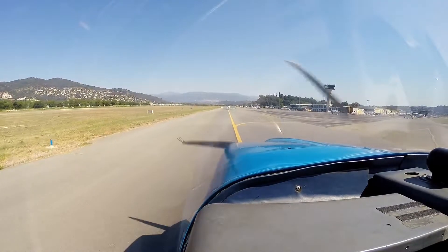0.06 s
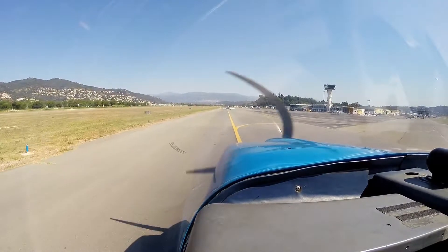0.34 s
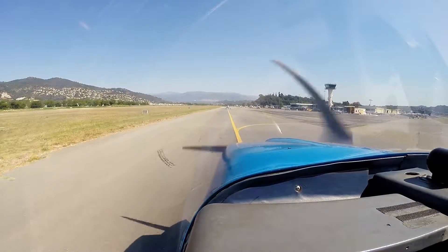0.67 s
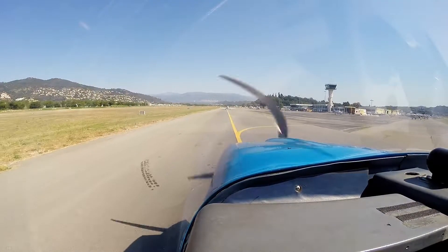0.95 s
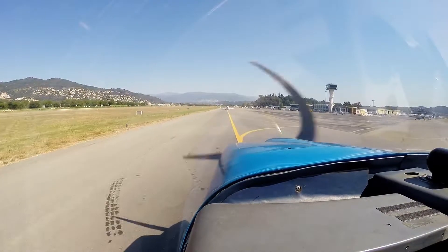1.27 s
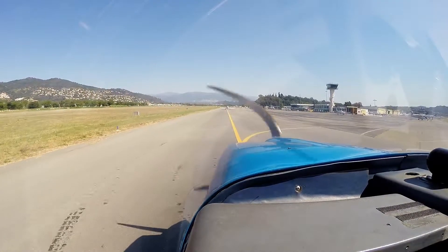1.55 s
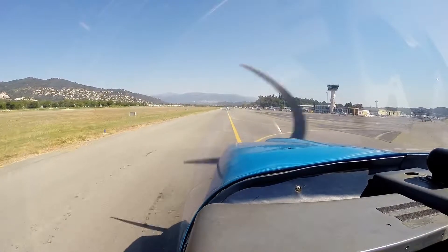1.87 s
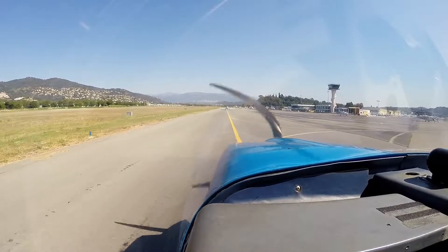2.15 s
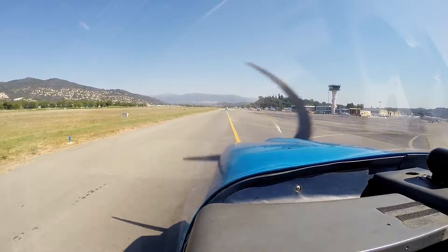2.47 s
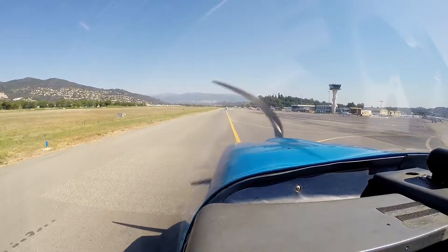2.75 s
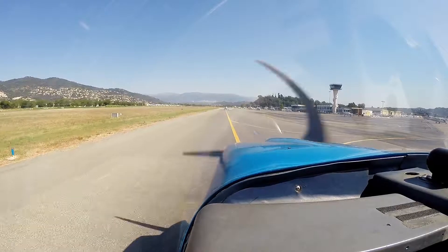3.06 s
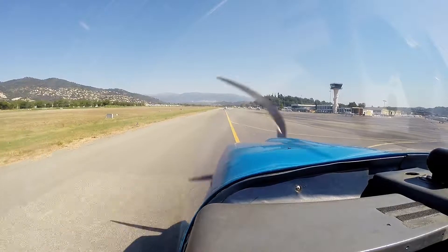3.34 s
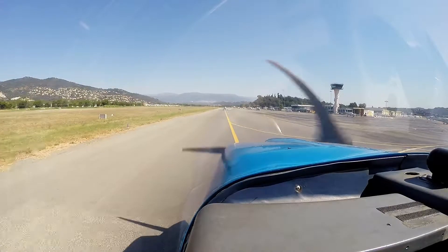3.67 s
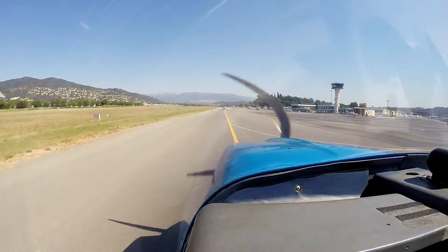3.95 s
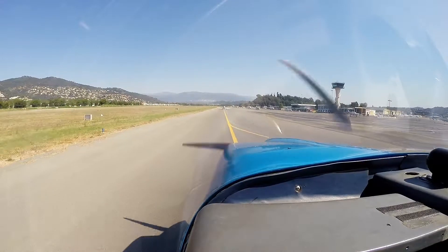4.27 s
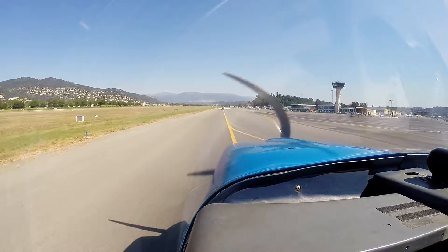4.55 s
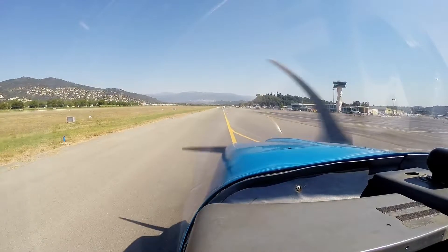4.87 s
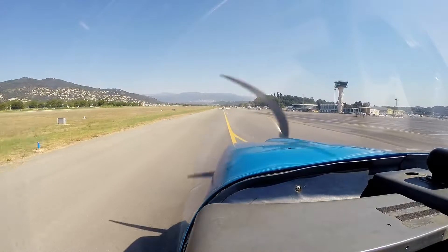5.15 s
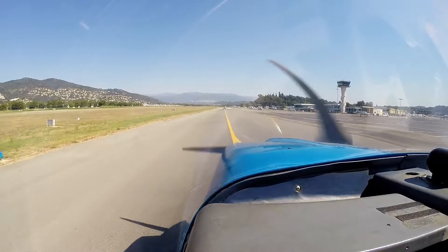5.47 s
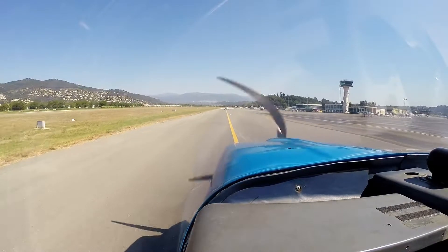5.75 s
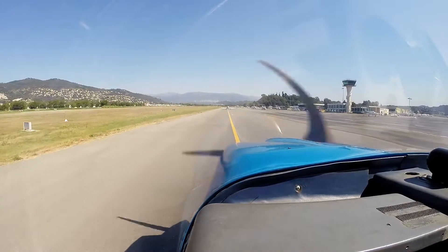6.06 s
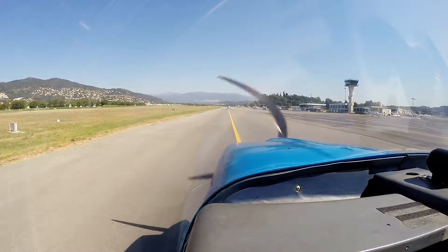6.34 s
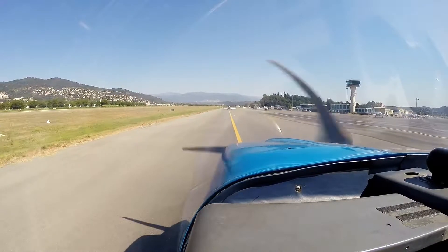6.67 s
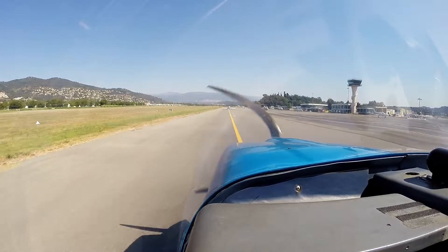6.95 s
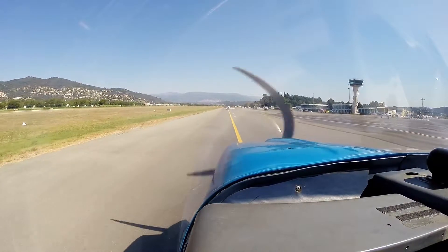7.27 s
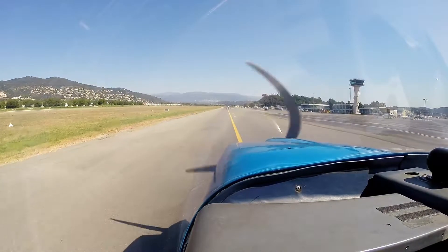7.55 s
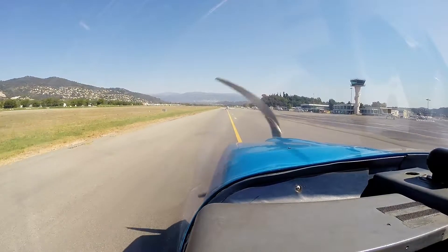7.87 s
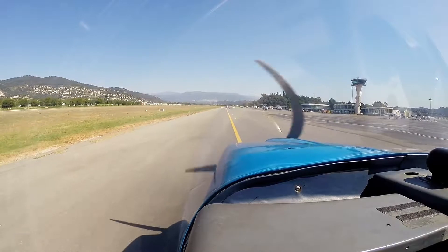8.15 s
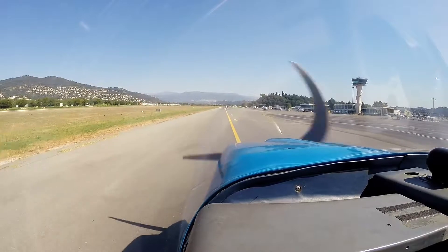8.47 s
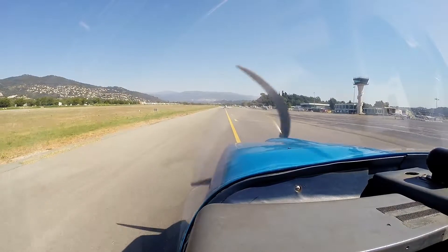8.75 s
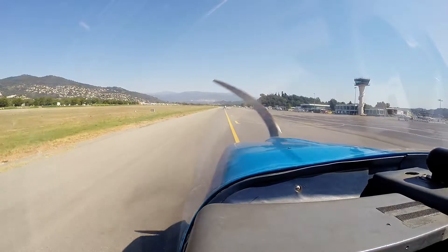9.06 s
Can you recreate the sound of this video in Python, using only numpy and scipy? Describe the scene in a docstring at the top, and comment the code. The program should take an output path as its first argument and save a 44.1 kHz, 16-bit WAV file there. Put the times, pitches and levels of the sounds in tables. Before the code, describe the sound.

Heard from one microphone inside a light aircraft's cockpit, a piston engine and propeller throb steadily at taxi power, with mechanical clatter, rushing air and low tyre rumble. About seven seconds in, the throttle lever clacks and the engine slows to a deeper, lumpier idle. The cabin booms, and a loose fitting that ticked only occasionally now rattles more busily.

```python
"""Light aircraft taxiing, from the cockpit

One microphone in the cabin, close behind a four-cylinder engine and propeller at about 1150 rpm.
The exhaust throbs, pistons and valves clatter, and combustion noise and propeller wash rush through
cowling and canopy; below, the tyres rumble on the taxiway. Near 7 s the throttle is eased back with a
clack. As the firing rate sinks to 28 Hz the cabin booms and a loose fitting ticks more busily."""
import sys
import numpy as np
from scipy.fft import rfft, irfft, next_fast_len
from scipy.io import wavfile
from scipy.ndimage import map_coordinates

SR = 44100
rng = np.random.default_rng(int(sys.argv[2]) if len(sys.argv) > 2 else 0)


def dump(signal):
    """Clip the signal to [-1, 1] and save it as 16-bit WAV at the path in sys.argv[1]."""
    limited = np.clip(np.atleast_2d(signal).T, -1, 1)
    pcm = np.round(limited * 32767).astype(np.int16)
    wavfile.write(sys.argv[1], SR, pcm)


N = 401747


def amp(db):
    """Decibels to gain."""
    return 10 ** (np.asarray(db) / 20)


def unit(x):
    """Scale to rms 1."""
    return x / np.sqrt(np.mean(x ** 2) + 1e-20)


def curves(rows):
    """One value per sample for each column after the time."""
    times, *columns = np.transpose(rows)
    return [np.interp(np.arange(N) / SR, times, column) for column in columns]


def wobble(rate_hz):
    """A smooth random curve with rate_hz knots a second."""
    coarse = np.linspace(0, N, 2 ** 13)
    knots = rng.standard_normal(int(N * rate_hz / SR) + 4)
    return np.interp(np.arange(N), coarse, map_coordinates(knots, [coarse * rate_hz / SR]))


def filtered(x, response):
    """Pass x through a gain given as a function of frequency."""
    size = next_fast_len(N + SR // 2)
    return irfft(rfft(x, size) * response(np.fft.rfftfreq(size, 1 / SR)), size)[:N]


def coloured(x, spectrum, resonances=()):
    """Shape x by a smooth spectrum with resonances on top, at rms 1."""
    freqs, levels = np.transpose(spectrum)
    log_freqs = np.log(np.r_[freqs[0] / 2, freqs, freqs[-1] * 2])

    def response(hz):
        slope_db = np.interp(np.log(hz + 1), log_freqs, np.r_[-120, levels, -120])
        peaks_db = sum(lift / (1 + (2 * (hz - mid) / width) ** 2) for mid, width, lift in resonances)
        return amp(slope_db + peaks_db)
    return unit(filtered(x, response))


def throttle(back_s=6.74, travel_s=0.26):
    """The throttle is eased back once: 1 at taxi power, 0 when closed."""
    return np.clip(1 - (np.arange(N) / SR - back_s) / travel_s, 0, 1)


# Engine speed in four-stroke cycles, two shaft turns each: time_s, cycle_hz
ENGINE_SPEED = [(0, 9.56), (1.6, 9.555), (2.3, 9.605), (5.6, 9.578), (6.8, 9.61), (7.05, 9.0), (7.42, 8.25),
                (7.95, 7.46), (8.7, 6.93), (9.1, 7.04)]


def relative_speed():
    """Engine speed as a share of taxi speed."""
    cycle_hz, = curves(ENGINE_SPEED)
    return cycle_hz / cycle_hz[0]


def effort(taxi_db, closed_db, halving_db):
    """Gain of an engine noise: add closed_db as the throttle shuts, halving_db per halving of speed."""
    return amp(taxi_db + closed_db * (1 - throttle()) - halving_db * np.log2(relative_speed()))


def stumble(cycle, jitter, idle_jitter):
    """The firings stray from their places in the cycle, much more so near idle."""
    return cycle + (jitter + idle_jitter * np.abs(1 - relative_speed())) * wobble(45)


def firing_phase(cycle):
    """Radians: one turn for each of the four firings in a cycle."""
    return 2 * np.pi * 4 * cycle


def cycle_pattern(cycle, harmonics):
    """A random shape of rms 1 that repeats with each engine cycle."""
    size = 2 ** 12
    shape = unit(irfft(np.r_[0, np.exp(2j * np.pi * rng.random(harmonics))], size))
    return np.interp(cycle % 1 * size, np.arange(size + 1), np.r_[shape, shape[0]])


def bursts(cycle, table, column, ring_cycles):
    """Each row starts a decaying burst at its place in the cycle; column holds its level."""
    return sum(amp(row[column]) * np.exp(-((cycle - row[0]) % 1) / ring_cycles) for row in table)


def contact_noise():
    """The part of an impact that never repeats: noise below 1900 Hz, at rms 1."""
    return unit(filtered(rng.standard_normal(N), lambda hz: hz < 1900))


# The cabin's booms and nulls at the microphone: pitch_hz, level_db
CABIN_RESPONSE = [(27, -9.2), (29, -8.8), (31.3, -15), (33, -25), (40, -28.2), (55, -26), (58.5, -24.5),
                  (61, -28.5), (65, -31.5), (70, -31), (76, -23), (85, -31.5), (96, -27), (105, -40),
                  (115, -31)]
# Lift of firing harmonics 1 to 3 at taxi power: lift_db
POWER_LIFT = [7, 0.5, 1.5]
# Slow drift of the drone: time_s, firing_tone_db, second_harmonic_db
DRONE_DRIFT = [(0, 0, 2), (2.1, 0.3, -.5), (3.6, -1.2, 2.5), (4.5, -1.2, 1), (5.5, -1, 0), (6.1, .8, 2.5),
               (6.65, -1.3, 4.5), (7.1, -2, -.5), (7.7, -3, -1), (8.3, -.6, .5)]
# Tones of the shaft and unequal cylinders: cycle_multiple, taxi_db, idle_db
LOPE_TONES = [(2, -31, -49), (3, -30, -39), (5, -35.5, -36), (6, -44, -35), (7, -37.5, -42), (9, -33, -38),
              (10, -39, -47), (11, -42, -39), (14, -44.5, -47), (16, -48, -47)]


def drone(cycle, waver_db, lope_waver_db, lag_cycles=0.076, null_hz=105):
    """Exhaust pulses and blade passages make one even throb; unequal cylinders add a lope."""
    out, power = np.zeros(N), throttle()
    firing_hz = np.gradient(firing_phase(cycle)) * SR / (2 * np.pi)
    exhaust_phase = firing_phase(cycle - lag_cycles)
    for k, (power_db, drift_db) in enumerate(zip(POWER_LIFT, curves(DRONE_DRIFT) + [0]), 1):
        db = np.interp(k * firing_hz, *np.transpose(CABIN_RESPONSE)) + power_db * power + drift_db
        polarity = np.tanh((null_hz - k * firing_hz) / 2)  # flips across the cabin's null
        out += polarity * amp(db + waver_db * wobble(12)) * np.sin(k * exhaust_phase)
    for k, taxi_db, idle_db in LOPE_TONES:
        level = amp(taxi_db * power + idle_db * (1 - power) + lope_waver_db * wobble(5.8))
        out += level * np.sin(2 * np.pi * (k * cycle + rng.random()))
    return np.sqrt(2) * out


# Engine harmonics singing in the cabin panels: cycle_multiple, level_db
PANEL_TONES = [(31, -47.5), (34, -49.5), (36, -44), (37, -48.5), (41, -46.5), (42, -45), (44, -51),
               (48, -52), (49, -50), (56, -42.5), (58, -50), (61, -48.5), (64, -46.5), (65, -42),
               (70, -53.5), (76, -53), (79, -60), (84, -63), (89, -62)]


def overtones(cycle, waver_db):
    """Clean upper harmonics set the panels singing at taxi speed and fade as the throttle closes."""
    out = np.zeros(N)
    for k, db in PANEL_TONES:
        out += amp(db + waver_db * wobble(4)) * np.sin(2 * np.pi * (k * cycle + rng.random()))
    return np.sqrt(2) * throttle() * out


# The four firings: place_cycles, knock_db, chuff_db, chirp_db
FIRINGS = [(0.039, -1.5, 3, -7), (.25, 2, 3, -4), (.515, 0, 4, 0), (0.81, -1, 3.5, -7)]
# Narrow resonances of the panels around the microphone: centre_hz, width_hz, lift_db
PANEL_MODES = [(294.8, 29, 5.5), (327, 10, 3.5), (343, 6, 4), (399, 16, 3), (421, 14, 7.5),
               (450.5, 21, 5.5), (540.4, 14, 7.5), (607.5, 60, 6), (735, 7.7, 5.5), (770, 26, 8),
               (880, 14, 5), (962, 28, 9)]
# Spectra of the pistons' hard knock and duller thud: freq_hz, level_db
PISTON_KNOCK = [(200, -26), (285, -3), (420, -5.5), (500, 0), (560, 1.5), (625, -1), (660, -6), (720, -22),
                (1000, -29), (1200, -24.5), (1400, -34.5), (2200, -46.5)]
PISTON_THUD = [(210, -21.5), (275, -1), (340, 0), (400, -3), (470, -1), (540, -7.5), (640, -25)]


def pistons(cycle, spectrum, ring_cycles, steady, loose, idle_loose):
    """The pistons knock hardest at the firings and shake the panels, less regularly near idle."""
    looseness = loose + idle_loose * (1 - throttle())
    irregular = looseness * contact_noise()
    knocks = (cycle_pattern(cycle, harmonics=200) + irregular) / np.hypot(1, looseness)
    envelope = steady + bursts(cycle, FIRINGS, 1, ring_cycles)
    return coloured(knocks * envelope, spectrum, PANEL_MODES)


# Valves and rockers landing: place_cycles, level_db
VALVE_LANDINGS = [(.085, -2), (.27, -7), (.37, -5), (.475, -4.5), (.555, -8), (.615, -2), (.725, -7),
                  (.83, -5), (.965, -5)]
# Spectrum of a landing: freq_hz, level_db
VALVE_SPECTRUM = [(950, -25), (1140, -1.5), (1230, 1), (1310, -3.5), (1420, -28.5)]
# Note of the rocker covers: centre_hz, width_hz, lift_db
COVER_MODE = [(1253, 52, 6)]


def valves(cycle, ring_cycles, loose):
    """Landing valves ring the rocker covers in a limping rhythm, partly alike from cycle to cycle."""
    irregular = loose * contact_noise()
    contact = cycle_pattern(cycle, harmonics=200) + irregular
    taps = bursts(cycle, VALVE_LANDINGS, 1, ring_cycles) * contact
    return coloured(taps, VALVE_SPECTRUM, COVER_MODE)


def chirps(cycle, start_hz, rise_hz, length_cycles, scatter_turns):
    """Each exhaust stroke whistles briefly, its note rising as the piston shrinks the cylinder."""
    cycle_hz, = curves(ENGINE_SPEED)
    out = np.zeros(N)
    for place, _, _, db in FIRINGS:
        stroke = np.minimum((cycle - place) % 1 / length_cycles, 1)
        turns = (start_hz + rise_hz * stroke / 2) * stroke * length_cycles / cycle_hz
        turns += scatter_turns * wobble(90)
        out += amp(db) * np.sin(np.pi * stroke) * np.sin(2 * np.pi * turns)
    return unit(out)


# Exhaust puffs as heard from inside: freq_hz, level_db
CHUFF_SPECTRUM = [(560, -8), (670, 2), (760, -1.5), (810, -8.5), (880, -12.5), (1000, -11.5), (1150, -17.5),
                  (1400, -26.5)]


def chuff(cycle, ring_cycles, steady):
    """Each exhaust valve lets out a puff, half the same each time and half turbulent."""
    gas = cycle_pattern(cycle, harmonics=200) + rng.standard_normal(N)
    envelope = steady + bursts(cycle, FIRINGS, 2, ring_cycles)
    return coloured(gas * envelope, CHUFF_SPECTRUM, PANEL_MODES)


# Low roar and high hiss of combustion and propeller wash: freq_hz, level_db
ROAR_SPECTRUM = [(130, -15.5), (240, -1.5), (330, 0), (480, -3), (600, 0.5), (680, -7.5), (780, -11.5),
                 (900, -17.5), (1010, -19.5), (1150, -10.5), (1300, -14), (1650, -15.5), (1950, -30.5),
                 (3000, -76.5)]
HISS_SPECTRUM = [(1200, -11), (2000, -3), (2400, 1), (3200, -4), (3600, -9), (5100, -13), (6900, -15.5),
                 (7600, -20), (9000, -22.5), (11500, -22.5), (13000, -29), (14800, -45)]
# Cowling and canopy, between the wash and the microphone: centre_hz, width_hz, lift_db
CANOPY_MODES = [(1253, 175, 7), (1405, 61, -8.5), (1525, 100, 3.5), (1798, 60, 5.5), (2520, 88, 4),
                (3014, 500, 3.5), (3407, 32, 7), (3880, 140, 6.5), (4554, 420, 7.5), (5810, 160, 9),
                (6240, 340, 5)]


def rush(cycle, spectrum, pulsing_db, flutter_db, lag_cycles=0.15):
    """Turbulence flutters through the canopy; any pulsing with the engine deepens near idle."""
    angle = firing_phase(cycle - lag_cycles)
    beat = np.cos(angle / 2) + np.cos(2 * angle)  # once per shaft turn, twice per firing
    beat += cycle_pattern(cycle, harmonics=15) / 2
    envelope = amp(pulsing_db * beat / relative_speed() + flutter_db * wobble(70))
    return coloured(envelope * rng.standard_normal(N), spectrum, CANOPY_MODES)


# Swells and slight dips as the taxiway passes underneath: middle_s, half_length_s, shake_db, drum_db
RUMBLE_SWELLS = [(.1, 0.26, 1.5, -0.5), (1.2, 0.27, -1, -1), (3.15, 0.31, 2.5, 3), (3.9, 0.46, 8, 3.5),
                 (4.294, 0.13, -1, 5), (6.902, 0.57, 2.5, 0.5), (7.654, 0.19, 2, 1)]
# Spectra of the deep sway, airframe shake and 135-210 Hz drumming: freq_hz, level_db
DEEP_SWAY = [(12, -24), (22, -8), (30, -6.5), (38, -4), (46, -10), (56, -21)]
AIRFRAME_SHAKE = [(30, -25), (45, -14), (60, -1), (80, -2), (97, -1), (115, -4.5), (150, -9), (260, -32)]
LOW_DRUM = [(90, -24.5), (135, 1.5), (155, -0.5), (172, -1.5), (210, -1.5), (235, -7), (400, -20.5)]
# Air modes of the cabin: centre_hz, width_hz, lift_db
AIR_MODES = [(29, 3.7, 9), (44.3, 7, 4.5), (83.1, 14.3, 11.5)]


def rumble(sway_db, shake_db, drum_db, idle_shake_db, idle_engine_shake_db):
    """The airframe shakes the cabin air; the tyres' low drumming is joined at idle by engine shake."""
    t, idle = np.arange(N) / SR, 1 - throttle()
    airframe_db = shake_db + idle_shake_db * idle
    drumming_db = drum_db + idle_engine_shake_db * idle
    for middle_s, half_s, shake_change_db, drum_change_db in RUMBLE_SWELLS:
        patch = np.exp(-((t - middle_s) / half_s) ** 2)
        airframe_db += shake_change_db * patch
        drumming_db += drum_change_db * patch
    shake = amp(airframe_db) * coloured(rng.standard_normal(N), AIRFRAME_SHAKE, AIR_MODES)
    sway = amp(sway_db) * coloured(rng.standard_normal(N), DEEP_SWAY, AIR_MODES)
    drum = amp(drumming_db) * coloured(rng.standard_normal(N), LOW_DRUM)
    return sway + shake + drum


def faint_strikes(count, snap_db, scatter_db, knock_db):
    """The loose fitting also touches lightly at random moments: rows of start_s, snap_db, knock_db."""
    draws = rng.random((count, 2))
    return [(when * N / SR, snap_db + scatter_db * force, knock_db) for when, force in draws]


# Strikes of a loose fitting in the cabin: start_s, snap_db, knock_db
FITTING_STRIKES = [(4.3485, -42.5, -45.5), (4.5516, -42, -48), (4.6465, -43, -46), (5.7483, -41, -41.5),
                   (6.997, -40.5, -47.5), (7.0918, -46, -51), (7.1134, -44, -46.5), (7.6081, -39, -40.5),
                   (7.674, -38, -42), (7.739, -47, -50), (7.8032, -40, -51), (7.8635, -33.5, -45),
                   (7.9305, -35.5, -43), (7.9927, -32, -38.5), (8.0264, -42.5, -42), (8.0606, -40.5, -38.5),
                   (8.0903, -45.5, -47), (8.1244, -45, -48), (8.1574, -46.5, -55.5), (8.407, -46.5, -51),
                   (8.4751, -46.5, -51), (8.5699, -40.5, -44.5), (8.6294, -51.5, -55.5), (8.7334, -48, -42),
                   (8.766, -44, -46.5), (8.8398, -46, -45.5), (8.9087, -40, -48)]
# Spectra of its snap and knock: freq_hz, level_db
FITTING_SNAP = [(2500, -13), (3500, -1), (4500, 5.5), (5400, 1), (6100, 4.5), (7000, -3), (8600, -14.5),
                (11000, -19), (12100, -23), (13000, -33), (14800, -42.5)]
FITTING_KNOCK = [(1800, -19.5), (2150, -14), (2450, 1.5), (3200, -1), (3600, -5.5), (4200, -30.5)]


def loose_fitting(strikes, contact_s, tail_db, tail_t60_s, snap_trim_db, knock_trim_db):
    """Each strike chatters for a few ms: a dry snap, a lower knock and a brief cabin tail."""
    t = np.arange(SR // 10) / SR
    decay = np.exp(-(t / contact_s) ** 2) + amp(tail_db - 60 * t / tail_t60_s)
    snaps, knocks = np.zeros((2, N + len(t)))
    for start_s, snap_db, knock_db in strikes:
        start = round(start_s * SR)
        span = slice(start, start + len(t))
        snaps[span] += amp(snap_trim_db + snap_db) * decay * rng.standard_normal(len(t))
        knocks[span] += amp(knock_trim_db + knock_db) * decay * rng.standard_normal(len(t))
    return (np.std(snaps) * coloured(snaps[:N], FITTING_SNAP)
            + np.std(knocks) * coloured(knocks[:N], FITTING_KNOCK))


# Clack of a control lever, within arm's reach: freq_hz, level_db
LEVER_SPECTRUM = [(1300, -22), (1550, -12), (1850, -8), (2100, 3), (2500, 12), (2900, -5), (3300, -14),
                  (5200, -19), (6100, -9), (7000, -24), (10000, -31), (13000, -43)]


def lever(start_s, contact_s, tail_db, tail_t60_s):
    """A control lever clacks once as the power comes off, and rings briefly."""
    t = np.maximum(np.arange(N) / SR - start_s, 0)
    decay = np.exp(-(t / contact_s) ** 2) + amp(tail_db - 60 * t / tail_t60_s)
    burst = (t > 0) * decay * rng.standard_normal(N)
    return np.std(burst) * coloured(burst, LEVER_SPECTRUM)


def scene():
    """The cockpit from one spot, in mono; one turning shaft drives every engine sound."""
    cycle_hz, = curves(ENGINE_SPEED)
    cycle = np.cumsum(cycle_hz) / SR
    strokes = stumble(cycle, jitter=0.00019, idle_jitter=0.03)
    overlap = relative_speed() ** 1.55  # near idle the firings stand apart
    tones = drone(cycle, waver_db=0.6, lope_waver_db=1) + overtones(strokes, waver_db=1)
    knocks = pistons(strokes, PISTON_KNOCK, ring_cycles=0.068, steady=2 * overlap ** 2,
                     loose=0.7, idle_loose=1)
    thuds = pistons(strokes, PISTON_THUD, ring_cycles=0.096, steady=0.78, loose=1.1, idle_loose=2.3)
    taps = valves(strokes, ring_cycles=0.062, loose=1.5)
    whistles = chirps(strokes, start_hz=800, rise_hz=420, length_cycles=0.14, scatter_turns=0.13)
    puffs = chuff(strokes, ring_cycles=0.059, steady=0.36 * overlap)
    roar = rush(cycle, ROAR_SPECTRUM, pulsing_db=0.5, flutter_db=0.5)
    hiss = rush(cycle, HISS_SPECTRUM, pulsing_db=0, flutter_db=0.66)
    engine = (tones
              + knocks * effort(taxi_db=-34, closed_db=2, halving_db=0.5)
              + thuds * effort(taxi_db=-42.5, closed_db=4.5, halving_db=1)
              + taps * effort(taxi_db=-46.5, closed_db=-3.5, halving_db=-6.5)
              + whistles * effort(taxi_db=-56.5, closed_db=2.5, halving_db=-3)
              + puffs * effort(taxi_db=-46, closed_db=0.5, halving_db=-8)
              + roar * effort(taxi_db=-36.5, closed_db=-0.5, halving_db=-8.5)
              + hiss * effort(taxi_db=-50.5, closed_db=-0.5, halving_db=-6))
    strikes = FITTING_STRIKES + faint_strikes(count=16, snap_db=-52.5, scatter_db=5, knock_db=-56.5)
    ticks = loose_fitting(strikes, contact_s=0.0044, tail_db=-15.5, tail_t60_s=0.14,
                          snap_trim_db=-7.5, knock_trim_db=-1.5)
    clack = amp(-33.5) * lever(start_s=6.9788, contact_s=0.0035, tail_db=-14, tail_t60_s=0.06)
    rolling = rumble(sway_db=-27, shake_db=-27.5, drum_db=-36.5,
                     idle_shake_db=0.3, idle_engine_shake_db=2)
    return (engine + rolling + ticks + clack)[None]


def record(dry):
    """The microphone loses the deepest bass and the highest treble; both ends fade briefly."""
    low_cut_hz, top_hz, fade_s = 17, 14800, 0.004
    from_edge = np.minimum(np.arange(N), np.arange(N)[::-1])
    fade = np.minimum(from_edge / (fade_s * SR), 1)
    band = lambda hz: (hz < top_hz) * hz ** 4 / np.hypot(hz ** 4, low_cut_hz ** 4)
    return np.array([filtered(fade * channel, band) for channel in dry])


dry = scene()
out = record(dry)
dump(out)
```